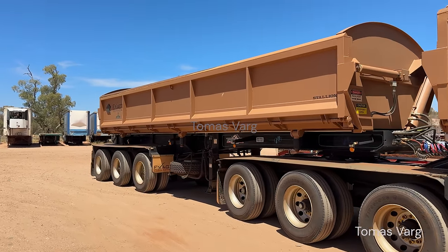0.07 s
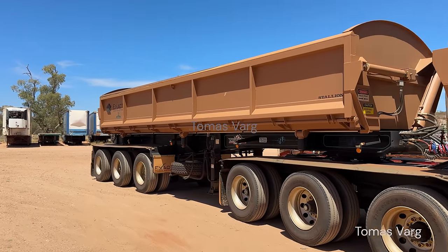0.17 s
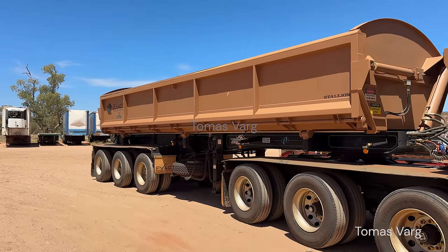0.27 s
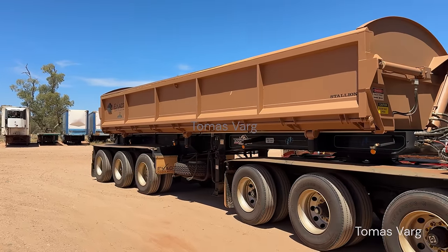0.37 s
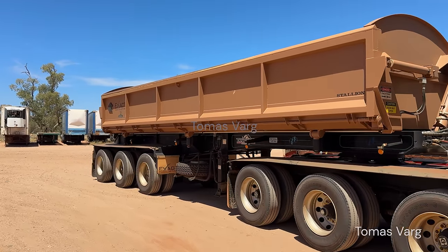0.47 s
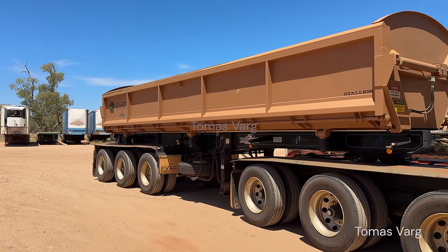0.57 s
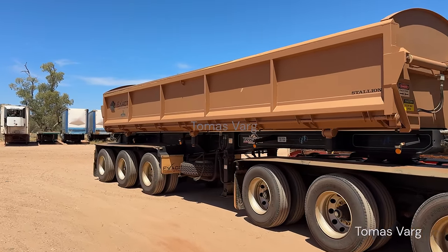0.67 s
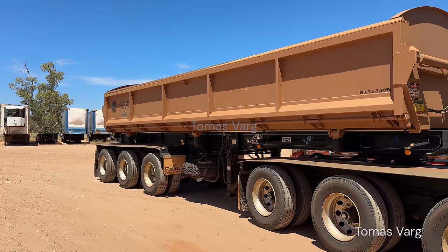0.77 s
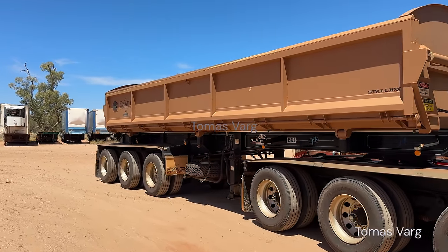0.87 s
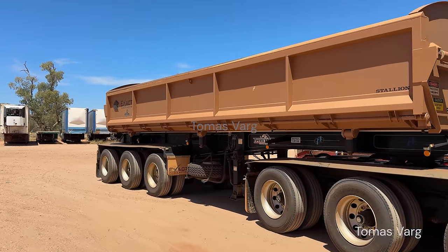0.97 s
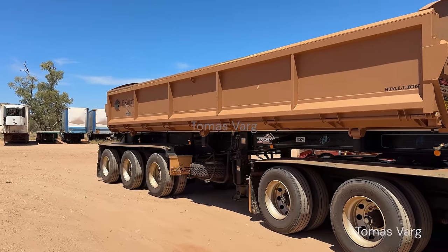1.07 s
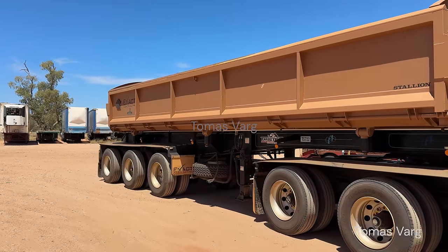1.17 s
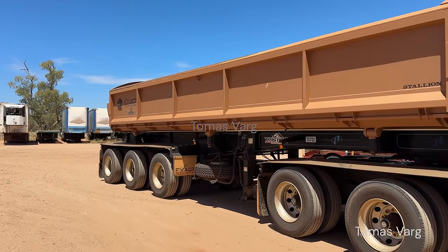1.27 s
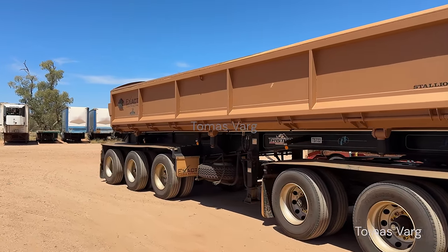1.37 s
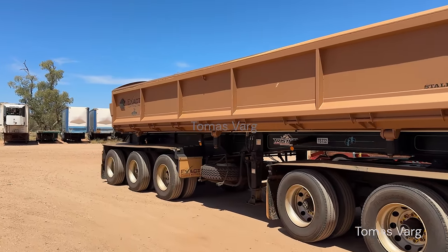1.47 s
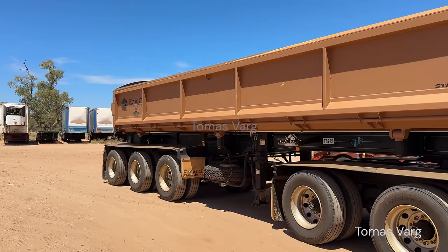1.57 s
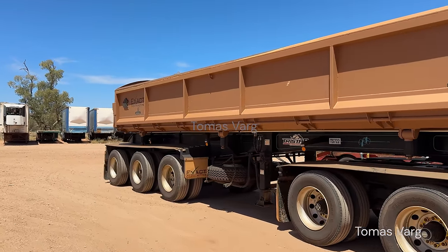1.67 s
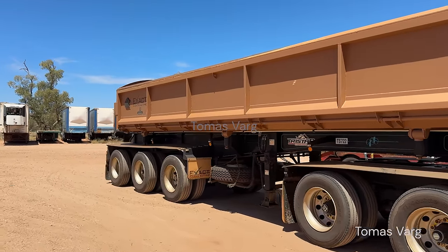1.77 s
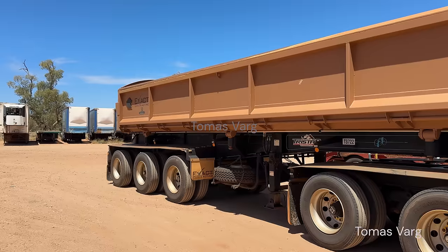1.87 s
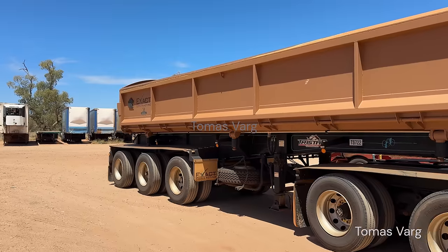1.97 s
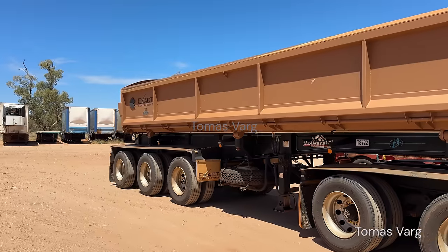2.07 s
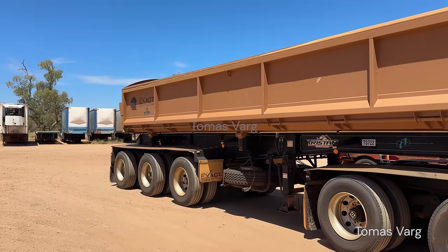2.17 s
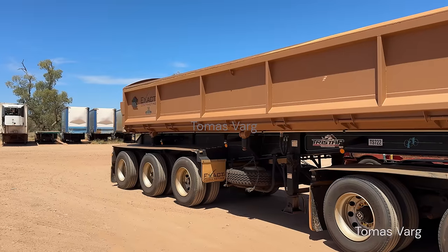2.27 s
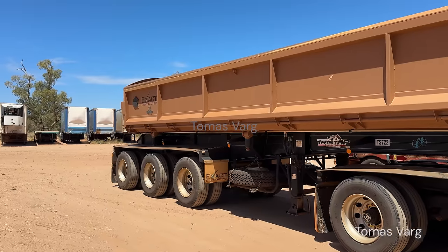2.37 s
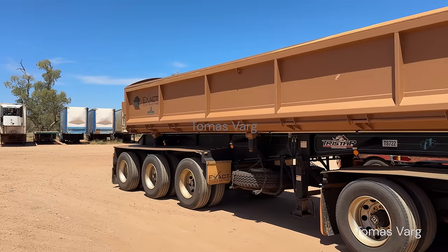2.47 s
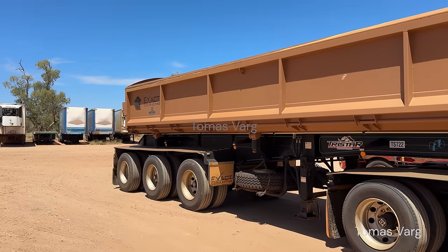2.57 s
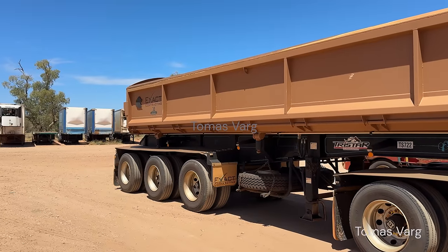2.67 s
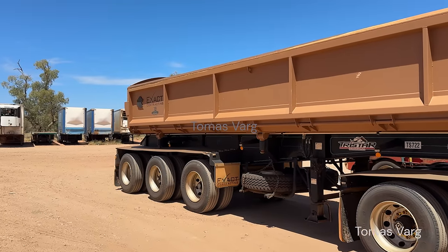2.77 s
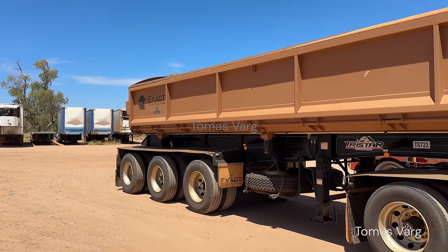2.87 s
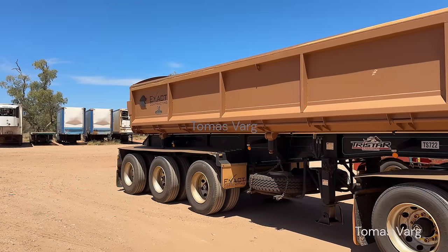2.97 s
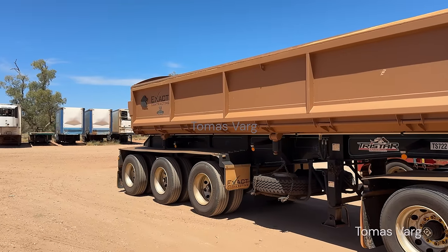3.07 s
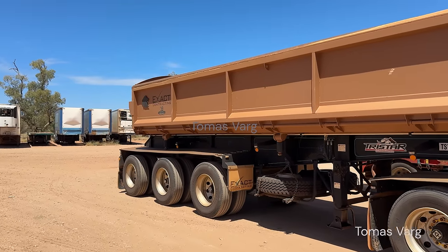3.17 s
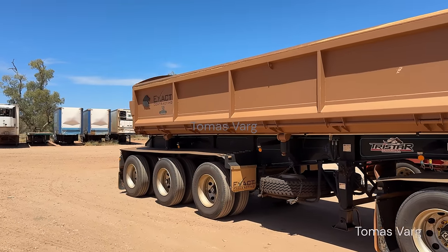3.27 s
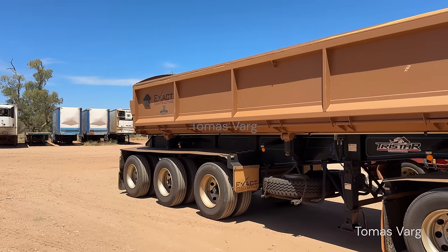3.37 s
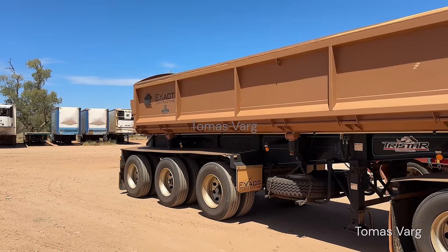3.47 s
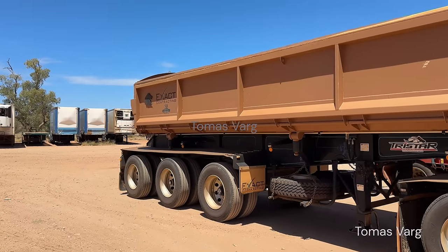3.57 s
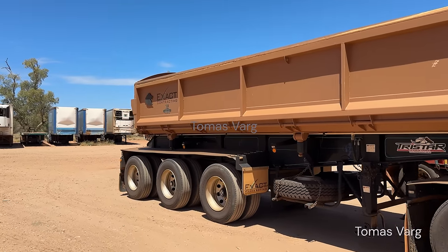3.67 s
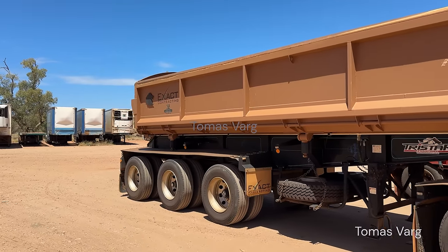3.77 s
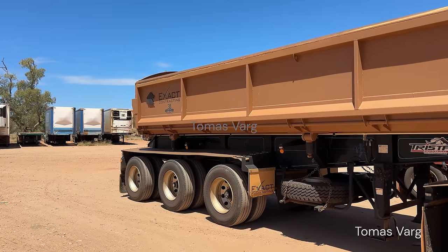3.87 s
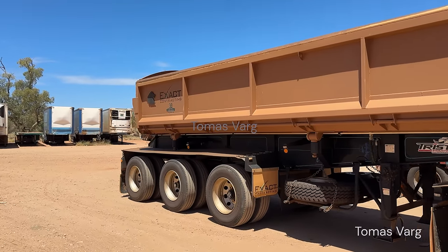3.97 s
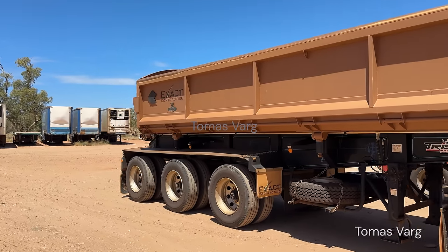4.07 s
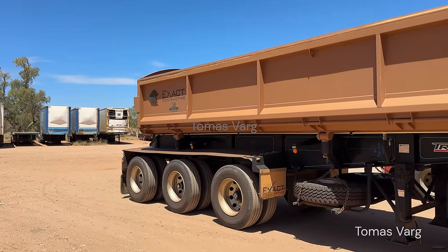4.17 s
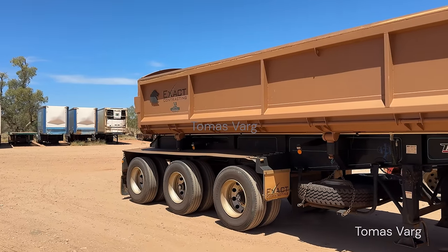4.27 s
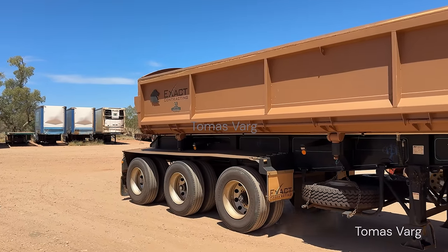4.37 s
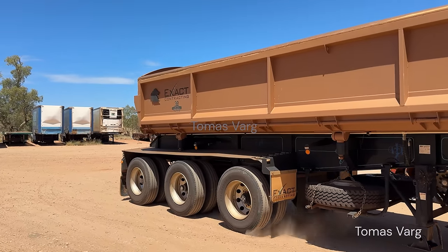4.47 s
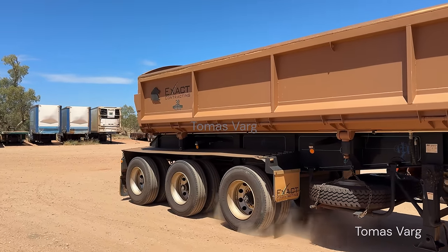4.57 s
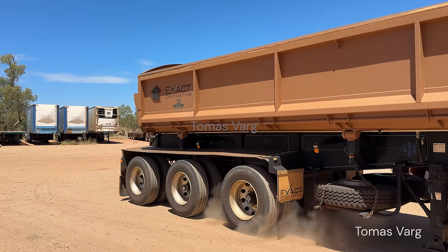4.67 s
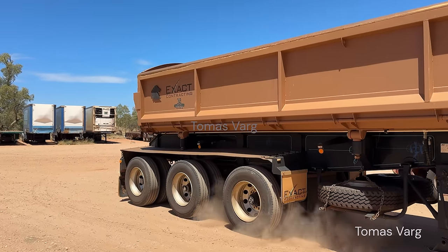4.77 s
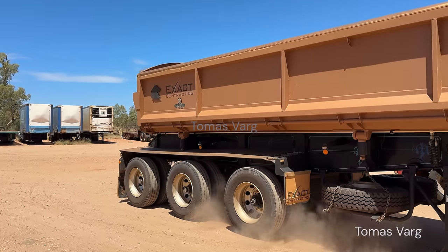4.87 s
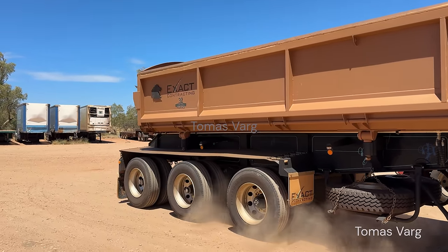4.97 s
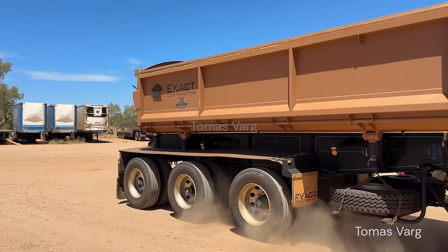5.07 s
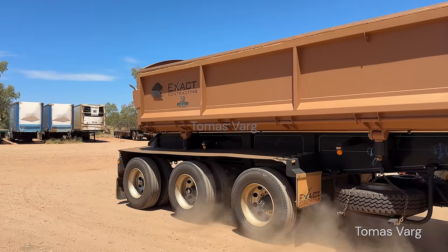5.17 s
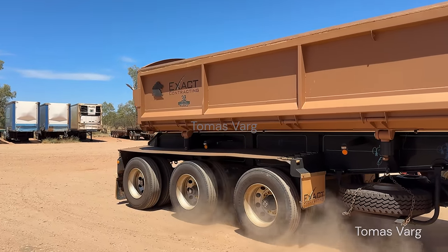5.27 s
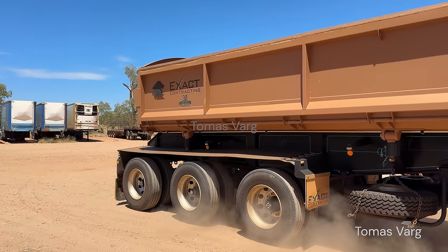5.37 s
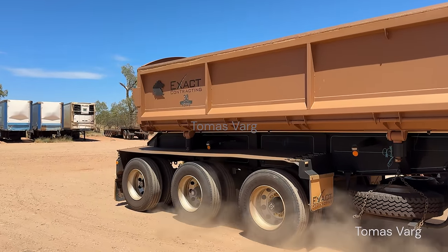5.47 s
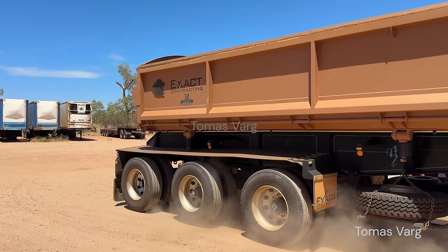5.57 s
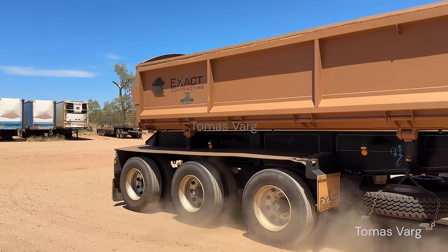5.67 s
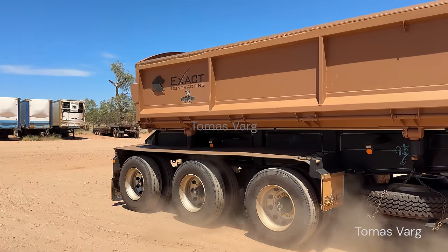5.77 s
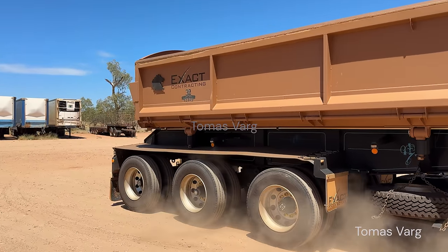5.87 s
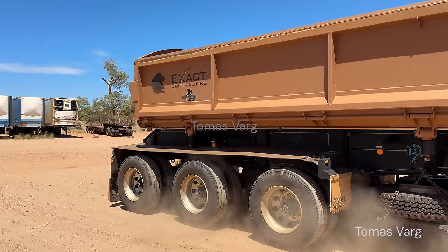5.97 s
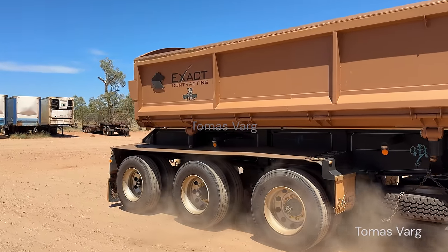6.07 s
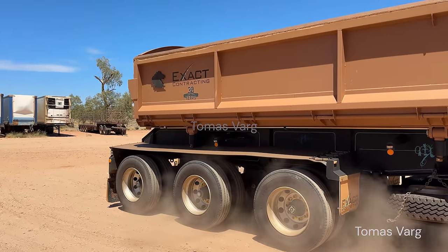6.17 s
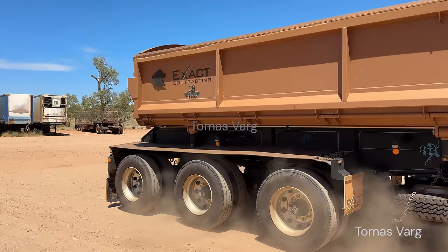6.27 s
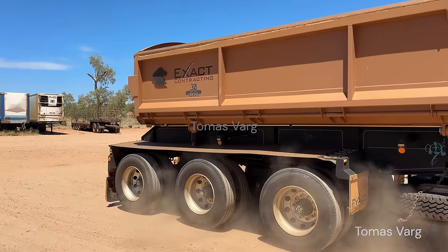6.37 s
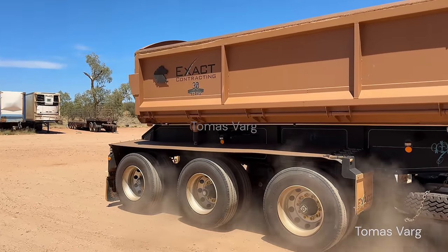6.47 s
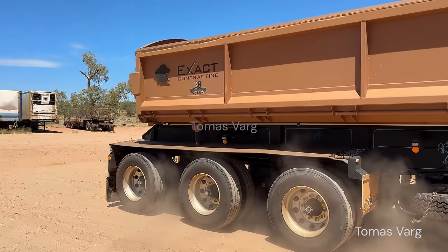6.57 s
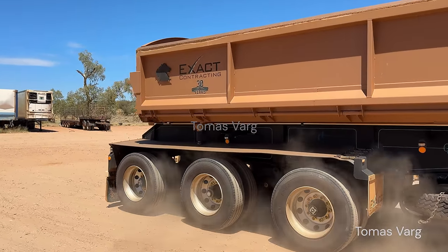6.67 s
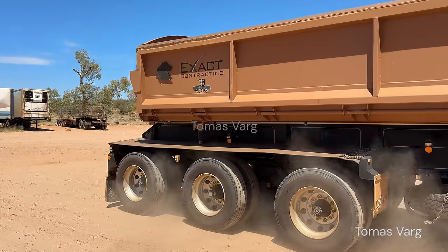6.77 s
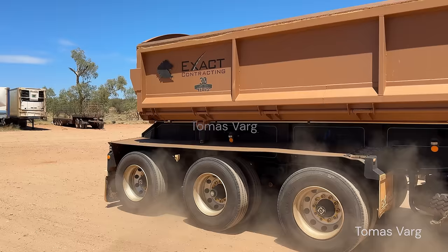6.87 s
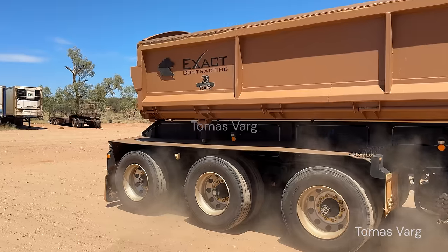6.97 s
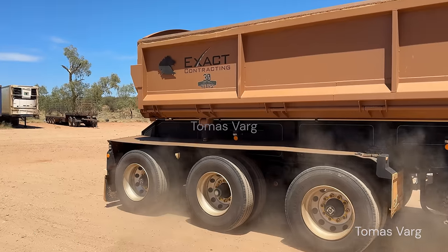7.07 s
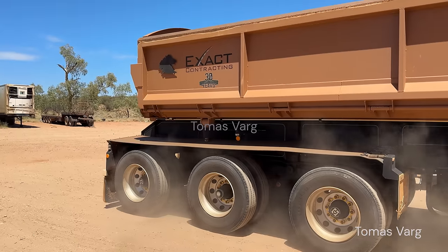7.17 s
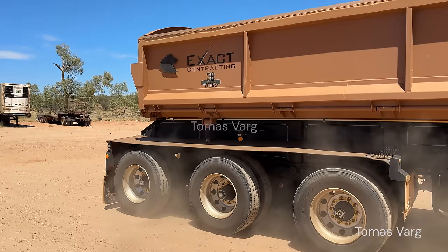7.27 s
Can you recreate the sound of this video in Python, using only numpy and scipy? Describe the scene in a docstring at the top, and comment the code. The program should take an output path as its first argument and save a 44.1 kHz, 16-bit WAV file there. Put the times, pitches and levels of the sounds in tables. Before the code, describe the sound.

Two diesel engines throb from the start, a low steady hum and a deeper note that sinks toward idle by about 2.5 s, over rumble, clatter and faint whine. Loose metal rattles, gritty ticks and tiny air puffs dot the slow roll; a dull thump and spitting puff at 1.6 s lead into a thin leak. At 2.5 s a steady brake hiss opens, sagging, then steps up at 3.5 and 3.8 s with low knocks. At 4.0 s a loud, full-bodied blast of air bursts out, briefly ringing, thickest until 4.6 s, then bright and fading until 5.6 s, with a weak remnant to 5.85 s. Quiet engine follows. A faint leak appears at 6.2 s, small rattles and a sharper spit at 6.5 s, then a second blast starts at 6.7 s, swells at 6.85 s and sags to the end. Close outdoor stereo, short steel and ground echoes, faint dull yard tail.

```python
"""A throbbing diesel and a second idling engine are heard first, as a tipper road train creeps through a yard.
The engines are stacks of sine waves over rumble and clatter; knocks are dying sines, rattles short noise bursts.
The air brakes spit, leak and hiss in steps, then exhaust valves dump air at the ground in two long blasts.
All air sounds are shaped noise. Steel and ground send short echoes to a pair of spaced microphones."""
import sys
import numpy as np
from scipy import signal
from scipy.fft import rfft, irfft, next_fast_len
from scipy.io import wavfile
from scipy.ndimage import uniform_filter1d, map_coordinates

SR = 44100
rng = np.random.default_rng(int(sys.argv[2]) if len(sys.argv) > 2 else 0)


def wav_out(sig):
    """Save sig, one row per channel (or a flat mono array), as 16-bit PCM at SR to the path in sys.argv[1]."""
    wavfile.write(sys.argv[1], SR, np.round(np.clip(np.atleast_2d(sig).T, -1, 1) * 32767).astype(np.int16))


N = 322812
FFT_SIZE = next_fast_len(N)
TIME = np.arange(N) / SR  # seconds
HZ = np.maximum(np.arange(FFT_SIZE // 2 + 1) * SR / FFT_SIZE, 1)  # frequency of each spectrum bin

# How sound from the axles, the chassis and the yard reaches the two microphones.
# Each row: frequency in Hz, lag of the left side in radians, likeness of the sides from 0 to 1,
# left level above the right in dB.
AXLE_PATH = [(60, 0.28, 1, 0.5), (666, 0.28, 0.46, 0), (1770, 4.06, 0.74, -1), (2840, 6.1, 0.29, 0.5),
             (4430, 6.5, 0.37, 3), (5060, 5.3, 0.02, 2.5), (7300, 8.06, 0.95, 0.5), (7840, 5.4, 0.8, 1),
             (9560, 9.47, 0.99, -0.5), (16040, 23.25, 0.8, 0)]
CHASSIS_PATH = [(60, 0, 0.93, 0.5), (760, 3.5, 0.47, -4), (2510, 3, 0.63, -0.5), (4500, 7, 0.4, 4),
                (6060, 8.5, 0.25, 3), (8000, 14, 0.35, 4), (8770, 14, 1, -2), (16200, 29.5, 0.94, 2.5)]
YARD_PATH = [(30, 2.5, .9, 0.73), (60, 0.05, 0.94, 0.76), (130, 0, 0.87, 0.85), (300, 0.15, 0.32, 0),
             (650, 4, 0.085, -1.7), (8040, -2.8, .15, 0.12)]
# Resonances of the exhaust port. Each row: centre in Hz, width in Hz, gain at the centre in dB.
PORT_RESONANCES = [(220, 45, 6.5), (820, 21, -2.5), (1134, 120, 4), (1470, 60, 5), (10720, 430, 0.5)]
# Resonances that ring only while the long blast opens.
# Each row: centre in Hz, width in Hz, gain at the centre in dB.
FIRST_RUSH_RESONANCES = [(1290, 160, 5.5), (1630, 160, 3), (3550, 130, 2), (8560, 70, 4.5)]


def from_db(db):
    """Turn decibels into a plain gain."""
    return 10 ** (np.asarray(db) / 20)


def rms(x):
    """Average strength of a signal."""
    return np.sqrt(np.mean(x ** 2) + 1e-20)


def curve(rows):
    """Join (seconds, value) points with straight lines, giving one value per sample."""
    seconds, values = np.transpose(rows)
    return np.interp(TIME, seconds, values)


def colour(points):
    """Gain at every frequency, from (Hz, dB) points joined along a logarithmic pitch scale."""
    hz, db = np.transpose(points)
    return from_db(np.interp(np.log(HZ), np.log(hz), db))


def resonance(modes):
    """Faint whistles that an opening lifts out of its jet, and hollows that it cuts."""
    return 1 + sum((from_db(db) - 1) / (1 + (2 * (HZ - hz) / width) ** 2) for hz, width, db in modes)


def to_time(spectrum):
    """Turn a spectrum back into a signal as long as the scene."""
    return irfft(spectrum, FFT_SIZE)[..., :N]


def drift(rate_hz):
    """Slow random wandering with spread 1; changes faster than rate_hz are weakened."""
    slow = to_time(rfft(rng.standard_normal(FFT_SIZE)) / (1 + (HZ / rate_hz) ** 2))
    return slow / rms(slow)


def noise_pair(path):
    """Noise spectra at both microphones: a shared part that lags on the left, and a diffuse part."""
    hz, *columns = np.transpose(path)
    lag, alike, pan_db = [np.interp(HZ, hz, column) for column in columns]
    alike = np.clip(alike, 0, 1)
    shared, left, right = rfft(rng.standard_normal((3, FFT_SIZE)))
    left = np.sqrt(alike) * shared * np.exp(-1j * lag) + np.sqrt(1 - alike) * left
    right = np.sqrt(alike) * shared + np.sqrt(1 - alike) * right
    return np.array([left * from_db(pan_db / 2), right * from_db(-pan_db / 2)])


def sounding(spectra):
    """Stereo signal, scaled so that the average of its two sides has rms 1."""
    pair = to_time(spectra)
    return pair / rms(pair.mean(0))


def rumble():
    """Low rumble under the engines: deep noise whose level rises and falls."""
    # Each row: time in seconds, level in dB.
    rumble_level = [(0, -46), (1.7, -43.5), (2.4, -47), (2.54, -37), (2.75, -40.5), (3.4, -45), (3.85, -43),
                    (4.3, -39), (5.7, -50.5), (6.5, -55), (6.75, -49), (7.32, -45.5)]
    # Each row: frequency in Hz, relative strength in dB per Hz.
    rumble_colour = [(20, -26.5), (40, -21), (65, -2), (100, -0.5), (135, 0), (160, -10.5), (220, -10.5),
                     (330, -34), (600, -64.5)]
    return from_db(curve(rumble_level)) * sounding(noise_pair(YARD_PATH) * colour(rumble_colour))


def clatter():
    """Diesel clatter and tyres on dirt: uneven noise, strongest in the low range."""
    # Each row: time in seconds, level in dB, around which the noise flutters.
    clatter_level = [(0, -48), (2.5, -48.5), (4, -44), (4.5, -54), (6.15, -59.5), (6.4, -57.5), (7.32, -52)]
    # Each row: frequency in Hz, relative strength in dB per Hz.
    clatter_colour = [(120, 7.5), (260, 0.5), (400, -1), (700, -3.5), (1300, -7.5), (2100, -17),
                      (3000, -21.5), (4500, -31), (6500, -33.5), (9000, -42.5), (15000, -67)]
    uneven = from_db(curve(clatter_level) + 1.2 * drift(60))
    return uneven * sounding(noise_pair(YARD_PATH) * colour(clatter_colour))


def engine_tone(hz, orders, wander, rough_db):
    """Sine waves locked to one slightly unsteady crankshaft; each order's strength varies by itself."""
    turns = np.cumsum(hz * (1 + wander * drift(2))) / SR
    tone = 0
    for multiple, db in orders:
        wave = np.sin(2 * np.pi * (multiple * turns + rng.random()))
        tone = tone + np.sqrt(2) * from_db(db + rough_db * drift(16.0)) * wave
    return tone


def running_gear_whine():
    """Faint whine of the running gear: wavering single tones."""
    # Each row: pitch in Hz before it is lowered by 2 %, level in dB before a lift of 0.5 dB.
    whine_tones = [(403.7, -72.5), (554.5, -79)]
    return sum(engine_tone(hz, [(0.98, db + 0.5)], wander=0.0055, rough_db=6.5) for hz, db in whine_tones)


def second_engine():
    """Exhaust note of the second engine, whose speed sags a little and recovers."""
    # Each row: time in seconds, firing rate in Hz.
    steady_speed = [(0, 60.3), (1.6, 60), (2.3, 58.3), (3.2, 58.6), (3.8, 60.3)]
    # Each row: time in seconds, level in dB before a lift of 0.74 dB.
    steady_level = [(0, -35), (.45, -32), (1.3, -33.5), (2.25, -38), (2.5, -32), (2.72, -40.5), (2.95, -31),
                    (3.35, -38.5), (3.9, -32.5), (4.3, -46.5), (4.9, -52.5), (6.2, -47), (6.65, -43.5),
                    (7.32, -45)]
    # Each row: multiple of the firing rate, relative level in dB.
    steady_orders = [(.5, -24), (1, 0), (1.5, -13), (2, -22)]
    tone = engine_tone(curve(steady_speed), steady_orders, wander=0.0024, rough_db=2.45)
    return from_db(curve(steady_level) + 0.74) * tone


def truck_engine():
    """Exhaust note of the truck, easing back to idle as it brakes."""
    # Each row: time in seconds, firing rate in Hz.
    truck_speed = [(0, 42.8), (1.2, 42.27), (1.9, 40.64), (2.2, 36.3), (2.55, 30.57), (7.32, 30)]
    # Its level, which swells, sinks and partly returns. Each row: time in seconds, level in dB.
    truck_level = [(0, -46), (1.5, -42), (2.2, -50), (3.8, -66), (4.8, -57), (7.32, -57.5)]
    # Each row: multiple of the firing rate, relative level in dB.
    truck_orders = [(1, 0), (2, 2.5), (3, -4), (9, -23)]
    tone = engine_tone(curve(truck_speed), truck_orders, wander=0.0041, rough_db=3.0)
    return from_db(curve(truck_level)) * tone


def engines():
    """Two exhaust notes and a whine over rumble and clatter."""
    tones = second_engine() + truck_engine() + running_gear_whine()
    # the lowest orders fade away as the revs drop below 38 Hz
    tones = signal.sosfilt(signal.butter(4, 38, "high", fs=SR, output="sos"), tones)
    fade_in = np.minimum(TIME / .008, 1)
    slightly_left = from_db([[.4], [-.4]])
    return fade_in * (tones * slightly_left + rumble() + clatter())


def grit(per_s, level_db, spread_db, low_hz, high_hz):
    """Small stones tick under the rolling tyres: random clicks of noise that die in milliseconds."""
    strength = from_db(spread_db * np.minimum(rng.exponential(1, N), 3))
    ticks = (rng.random(N) < per_s / SR) * strength
    crumbling = signal.lfilter([1], [1, -np.exp(-1 / (0.003 * SR))], ticks + 1e-18)
    band = signal.butter(2, [low_hz, min(high_hz, SR * .45)], "band", fs=SR, output="sos")
    return from_db(level_db) * signal.sosfilt(band, crumbling * to_time(noise_pair(CHASSIS_PATH)))


def bursts(rows, path, grain_db):
    """Brief bursts of noise, each in its own band of pitch; grain makes their strength uneven."""
    noise = to_time(noise_pair(path)) * from_db(grain_db * drift(200))
    out = np.zeros((2, N))
    for peak_s, db, rise_s, decay_s, hz, width in rows:
        span = slice(max(int((peak_s - 10 * rise_s) * SR), 0), int((peak_s + 10 * decay_s) * SR))
        edges = [hz / (1 + width), min(hz * (1 + width), SR * .45)]
        band = signal.sosfilt(signal.butter(2, edges, "band", fs=SR, output="sos"), noise[:, span])
        age = TIME[span] - peak_s
        envelope = np.exp(np.minimum(age / rise_s, -age / decay_s))
        out[:, span] += from_db(db) * band / rms(band) * envelope
    return out


def chassis_rattles():
    """Loose chassis parts rattle in grainy bursts."""
    # Each row: peak in seconds, level in dB, rise in seconds, decay in seconds, centre in Hz,
    # width as a share of the centre.
    rattle_rows = [(.02, -52, .002, 0.034, 1500, 0.66), (.097, -47.5, .003, 0.019, 1500, 0.41),
                   (.186, -50, .001, .004, 2470, 0.17), (.587, -43, .001, .004, 1250, 0.34),
                   (.602, -50.5, .003, 0.022, 1800, 0.56), (.903, -49, .0015, 0.012, 2400, 0.19),
                   (.931, -56, .002, 0.005, 3450, 0.1), (1.18, -55, .002, .016, 2400, 0.31),
                   (1.26, -49, .002, 0.0062, 1900, 0.31), (1.742, -43, 0.0045, 0.012, 1300, 0.92),
                   (1.838, -44.5, 0.032, 0.01, 1310, 0.56), (2.15, -46.5, 0.0044, 0.022, 1140, 0.49),
                   (2.235, -47, .002, .006, 1300, .9), (2.33, -41.5, 0.016, 0.0079, 250, 0.61),
                   (2.338, -45.5, .004, 0.009, 1400, 0.7), (2.407, -46, 0.011, 0.022, 1250, 0.6),
                   (2.441, -46.5, .003, .008, 1400, 0.66), (6.416, -49, .004, .009, 1300, 0.57),
                   (6.52, -49, .004, 0.0068, 1248, .7)]
    return bursts(rattle_rows, YARD_PATH, grain_db=2.0)


def knocks():
    """Dull knocks of the brake gear: each sets the frame swinging for a few cycles."""
    # Each row: start in seconds, level in dB, ringing pitch in Hz, decay in seconds.
    knock_rows = [(1.6, -22, 67, .025), (2.509, -44, 62, .035), (2.521, -31, 126, 0.023),
                  (3.53, -34, 126.5, 0.045), (3.821, -24, 87, 0.07), (3.825, -21, 130, .025),
                  (4.042, -28, 109, 0.027), (4.191, -29, 104, 0.064)]
    out = 0
    for start_s, db, hz, decay_s in knock_rows:
        age = np.maximum(TIME - start_s, 0)
        out = out + from_db(db) * np.sin(2 * np.pi * hz * age) * np.exp(-np.minimum(age / decay_s, 40))
    return out


def air_puffs():
    """Short puffs of air: brief noise bursts."""
    # Each row: peak in seconds, level in dB, rise in seconds, decay in seconds, centre in Hz,
    # width as a share of the centre.
    puff_rows = [(.022, -66, .003, 0.11, 5640, 0.46), (.588, -63, .003, 0.11, 5000, 0.58),
                 (.65, -69, .012, 0.051, 7050, 0.34), (.91, -74, .006, 0.012, 6500, .2),
                 (1.185, -65, .005, .04, 5600, 0.46), (1.28, -68, .03, .07, 3900, .8),
                 (1.603, -54, .004, 0.045, 6160, 0.3), (1.639, -33, 0.014, 0.018, 4770, 0.23),
                 (1.675, -46, .012, 0.038, 3840, 0.29), (1.785, -45.5, 0.017, .023, 4500, 0.38),
                 (2.08, -55, .04, 0.12, 5800, .35), (3.515, -37, .003, .11, 4030, .12),
                 (6.541, -48, .0005, 0.012, 4200, .9)]
    return bursts(puff_rows, CHASSIS_PATH, grain_db=0.5)


def jet(openings, noise, swell_db, sag_db_per_s, open_s, close_s, flutter_db):
    """Turbulent air through a valve that opens in stages; roar, hiss and sizzle sag with the pressure."""
    settle_s = 0.014  # how quickly a new opening settles
    levels = 0
    for opens, shuts, *start_db in openings:
        age = np.maximum(TIME - opens, 0)
        # a positive swell starts too soft, a negative one starts with a spit
        flow_db = -swell_db * np.exp(-age / settle_s) - sag_db_per_s * age
        flow = from_db(flow_db) * (TIME >= opens) * (TIME < shuts)
        levels = np.maximum(levels, np.outer(from_db(start_db), flow))
    # the valve snaps open, but the line takes a moment to empty when it shuts
    emptied = TIME / close_s
    levels = np.exp(np.maximum.accumulate(np.log(levels + 1e-9) + emptied, axis=1) - emptied)
    levels = uniform_filter1d(levels, max(int(open_s * SR), 1), axis=1)
    above_roar = 1 / (1 + (2500 / HZ) ** 8)
    above_hiss = 1 / (1 + (7500 / HZ) ** 10)
    bands = [1 - above_roar, above_roar - above_hiss, above_hiss]
    surge = drift(32)  # shared by all three bands
    air = 0
    for level, band in zip(levels, bands):
        flutter = from_db(flutter_db * (surge + drift(60)))
        air = air + level * sounding(noise * band) * flutter
    return air


def air_leaks():
    """A spitting leak at the chassis, then later leaks at the rear axles."""
    # Each row: opens in seconds, shuts in seconds, then roar, hiss and sizzle in dB before swell and sag.
    leak_openings = [(1.65, 2.51, -62.5, -53, -61), (6.208, 6.538, -65.5, -57.5, -70.5),
                     (6.538, 6.665, -56, -48, -54.5)]
    # Each row: frequency in Hz, relative strength in dB per Hz.
    leak_colour = [(700, -1), (1300, 2), (2000, 3.5), (2700, 2), (3600, 1), (6600, -1), (8500, -10),
                   (10500, -11), (12000, -17), (15500, -18)]
    # The chassis shades the top of the first leak. Each row: frequency in Hz, gain in dB.
    chassis_shade = [(6000, 2.5), (9000, 5), (14000, -14)]
    shaded = noise_pair(CHASSIS_PATH) * colour(leak_colour) * colour(chassis_shade)
    first = jet(leak_openings[:1], shaded, swell_db=-6.0, sag_db_per_s=5.0,
                open_s=0.011, close_s=.02, flutter_db=0.4)
    # by now the rear axles have rolled up to the microphones
    later = jet(leak_openings[1:], noise_pair(AXLE_PATH) * colour(leak_colour), swell_db=11.5,
                sag_db_per_s=12.0, open_s=0.003, close_s=0.021, flutter_db=0.0)
    return first + later


def supply_hiss():
    """The supply valve hisses and opens further in steps."""
    # Each row: opens in seconds, shuts in seconds, then roar, hiss and sizzle in dB before swell and sag.
    hiss_openings = [(2.512, 3.51, -38.5, -36.5, -52), (3.51, 3.822, -40, -33, -48),
                     (3.822, 4.04, -33, -25, -39)]
    # Each row: frequency in Hz, relative strength in dB per Hz.
    hiss_colour = [(120, 4.5), (250, 0.5), (450, -2), (1000, 3), (1900, 2.5), (2500, -2.5), (3400, -4.5),
                   (4100, -4.5), (5200, -8.5), (6500, -6.5), (8000, -11), (10500, -14), (15500, -21)]
    # Resonances of the valve. Each row: centre in Hz, width in Hz, gain at the centre in dB.
    hiss_modes = [(3450, 200, 0.5), (4130, 670, -1), (6500, 500, 1.5)]
    noise = noise_pair(CHASSIS_PATH) * colour(hiss_colour) * resonance(hiss_modes)
    return jet(hiss_openings, noise, swell_db=5.5, sag_db_per_s=8.0,
               open_s=0.022, close_s=0.018, flutter_db=0.5)


def breaking_up(openings, rush_modes, rush_s):
    """Noise spectra of a blast that starts focused and ringing, then spreads into diffuse turbulence."""
    # How the still smooth jet reaches the microphones. Each row: frequency in Hz, left lag in radians,
    # likeness of the sides from 0 to 1, left level above the right in dB.
    port_path = [(60, .1, 1, 0.5), (1140, 2.3, 0.97, -2.5), (1580, 3.1, 0.99, 1), (1810, 3.2, 1, -2),
                 (2690, 5, 0.2, -1.5), (4300, 6.6, 0.6, 4), (5200, 9.4, .65, 3), (7020, 13.7, .65, 2),
                 (8150, 12.5, 0.87, 1), (9700, 15.7, 1, -1), (16160, 29.85, 0.9, 1)]
    smooth = 1 / (1 + (np.maximum(TIME - openings[0][0], 0) / rush_s) ** 6)
    rush = to_time(noise_pair(port_path) * resonance(rush_modes))
    turbulence = to_time(noise_pair(AXLE_PATH))
    return rfft(np.sqrt(smooth) * rush + np.sqrt(1 - smooth) * turbulence, FFT_SIZE)


def chamber_dump():
    """A second, wider port dumps one air chamber at the start of the long blast."""
    # Each row: opens in seconds, shuts in seconds, then roar, hiss and sizzle in dB before swell and sag.
    dump_openings = [(4.038, 4.205, -28.5, -26, -35), (4.205, 4.562, -27.5, -24, -32.5)]
    # Each row: frequency in Hz, relative strength in dB per Hz.
    dump_colour = [(70, -15.5), (130, -1.5), (230, -5), (400, -10), (600, -5.5), (1200, -0.5), (1750, 2.5),
                   (2100, 0.5), (2900, 3), (4600, 4.5), (5300, 1.5), (7200, -8), (8500, 5), (15500, -17)]
    # Resonances of the wider port. Each row: centre in Hz, width in Hz, gain at the centre in dB.
    dump_modes = [(2810, 44, 8), (3500, 90, 5), (4580, 150, 3), (8560, 120, 7)]
    noise = breaking_up(dump_openings, FIRST_RUSH_RESONANCES, rush_s=0.17) * colour(dump_colour)
    noise = noise * resonance(PORT_RESONANCES) * resonance(dump_modes)
    return jet(dump_openings, noise, swell_db=-2.5, sag_db_per_s=8.0,
               open_s=.002, close_s=0.025, flutter_db=2.0)


def exhaust_blasts():
    """Exhaust valves dump air at the ground in two long blasts."""
    # Each row: opens in seconds, shuts in seconds, then roar, hiss and sizzle in dB before swell and sag.
    blast_openings = [(4.038, 5.56, -26.5, -21.5, -18), (5.56, 5.854, -38.5, -34.5, -29.5),
                      (6.666, 6.84, -38.5, -32.5, -28), (6.84, 7.33, -35, -29.5, -25)]
    # Colours of the first and last blast. Each row: frequency in Hz, relative strength in dB per Hz.
    first_colour = [(60, -22.5), (120, -5.5), (220, -8.5), (320, -6.5), (480, -4), (640, 0.5), (1150, 2.5),
                    (1600, -1), (2100, -4), (3400, -5.5), (5000, -6), (7300, -4), (8500, 0), (11000, 1),
                    (12000, -1), (15500, 0)]
    last_colour = [(60, -20), (120, -3), (240, -9.5), (350, -2.5), (600, 2), (1100, 5), (1600, 0),
                   (2100, -3.5), (3400, -5.5), (5000, -5), (6500, -3), (8500, -0.5), (10600, 0),
                   (12000, -1.5), (15500, -2)]
    # Resonances and one hollow while the last blast opens.
    # Each row: centre in Hz, width in Hz, gain at the centre in dB.
    last_rush_modes = [(1250, 120, 6), (1640, 140, 9), (3300, 380, -20), (6950, 900, 3)]
    port = resonance(PORT_RESONANCES)
    early, late = blast_openings[:2], blast_openings[2:]
    noise = breaking_up(early, FIRST_RUSH_RESONANCES, rush_s=0.11) * colour(first_colour) * port
    first = jet(early, noise, swell_db=-0.5, sag_db_per_s=6.5,
                open_s=0.0033, close_s=0.019, flutter_db=0.22)
    # the last blast is closer and loses its pressure faster
    noise = breaking_up(late, last_rush_modes, rush_s=.15) * colour(last_colour) * port
    last = jet(late, noise, swell_db=3.5, sag_db_per_s=14.5,
               open_s=0.0073, close_s=0.013, flutter_db=0.6)
    return first + last


def eddies(x, depth_db, width_hz, life_s):
    """Turbulence keeps lifting and hollowing narrow parts of the hiss, each for a moment."""
    hz, seconds, bands = signal.stft(x, SR, nperseg=1024)
    chance = rng.standard_normal((400, 400))
    places = np.meshgrid(hz / width_hz, seconds / life_s, indexing="ij")
    patches = map_coordinates(chance, places, order=3, mode="wrap")
    return signal.istft(bands * from_db(depth_db * patches), SR)[1][:, :N]


def steel_echoes(x, level_db, spread_s, slide_s_per_s, count):
    """Quick reflections under the trailer; their paths change as it rolls, so the ripple keeps shifting."""
    out = 0
    for place, slide, sign in rng.uniform(-1, 1, (count, 3)):
        delay = .003 + spread_s * abs(place) + slide * slide_s_per_s * (TIME - TIME.mean())
        echo = np.array([np.interp(TIME - delay, TIME, side) for side in x])
        out = out + np.sign(sign) * echo
    return from_db(level_db) * out / np.sqrt(count)


def yard_tail(x, level_db, t60):
    """A faint dull tail returns from the yard: noise that fades by 60 dB in t60 seconds."""
    # Each row: frequency in Hz, gain in dB.
    tail_colour = [(150, 5), (400, 13), (1000, 6), (3500, 1.5), (5000, -5.5), (8000, -13), (15000, -28)]
    age = TIME[:SR]
    tail = rng.standard_normal((2, SR)) * from_db(-60 * age / t60) * (age > .02)
    tail = tail / np.linalg.norm(tail[0])
    tail = to_time(rfft(tail, FFT_SIZE) * colour(tail_colour))[:, :SR]
    return from_db(level_db) * signal.oaconvolve(x, tail, axes=1)[:, :N]


def scene():
    """Air, rattles and grit pass through the echoes of trailer and yard; knocks and engines lie under them."""
    small = air_puffs() + chassis_rattles()
    small = small + grit(per_s=14, level_db=-73.0, spread_db=5.0, low_hz=1500, high_hz=7000)
    jets = air_leaks() + supply_hiss() + exhaust_blasts() + chamber_dump()
    near = eddies(jets, depth_db=1.24, width_hz=90, life_s=.08) + small
    echoes = steel_echoes(near, level_db=-12.0, spread_s=.022, slide_s_per_s=0.000393, count=12)
    tail = yard_tail(near, level_db=-20.0, t60=0.53)
    return near + echoes + tail + knocks() + engines()


def record(dry):
    """Round the highest peaks and cut the top of the treble steeply."""
    cutoff_hz = 15350
    rounded = dry / (1 + (dry / .88) ** 6) ** (1 / 6)
    return signal.sosfiltfilt(signal.ellip(10, .05, 50, cutoff_hz, fs=SR, output="sos"), rounded)


dry = scene()
out = record(dry)
wav_out(out)
```